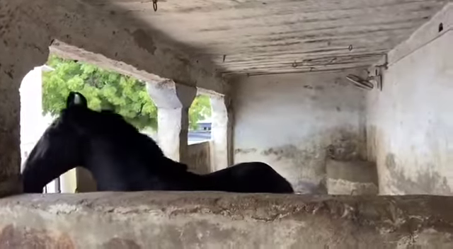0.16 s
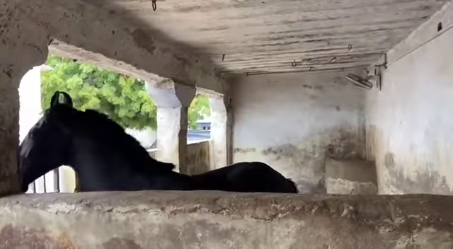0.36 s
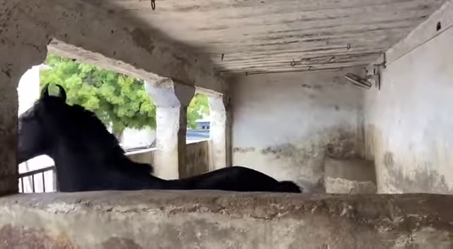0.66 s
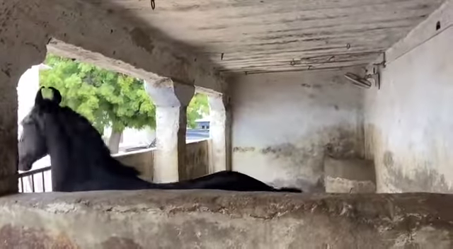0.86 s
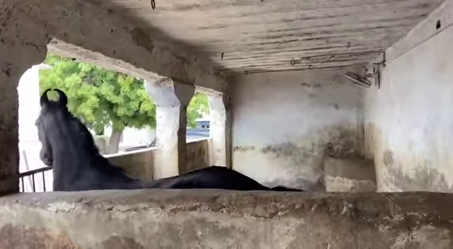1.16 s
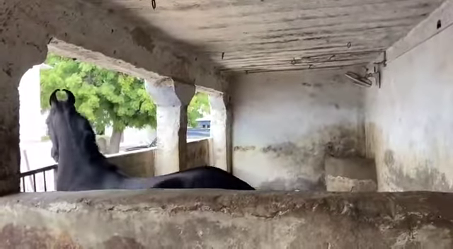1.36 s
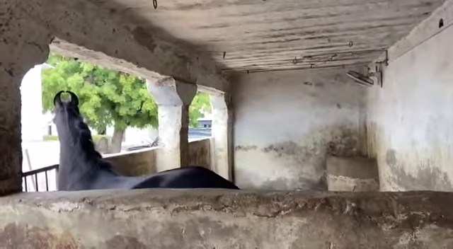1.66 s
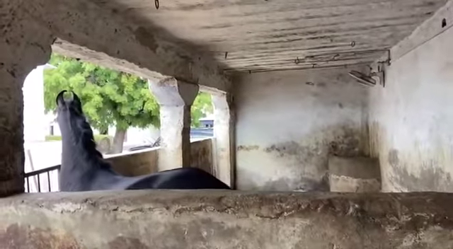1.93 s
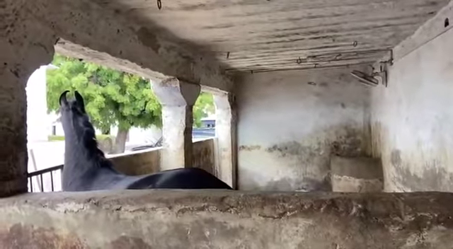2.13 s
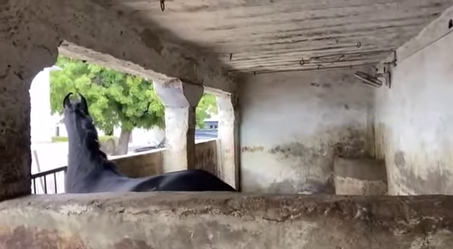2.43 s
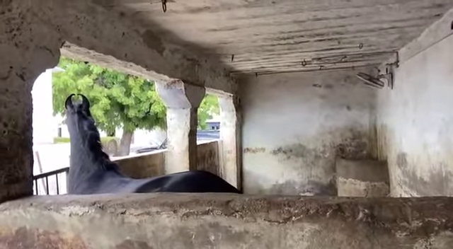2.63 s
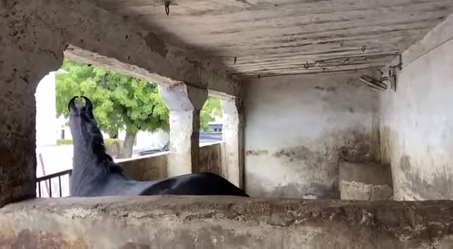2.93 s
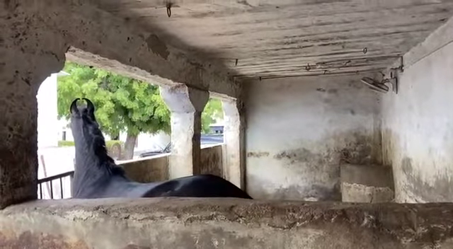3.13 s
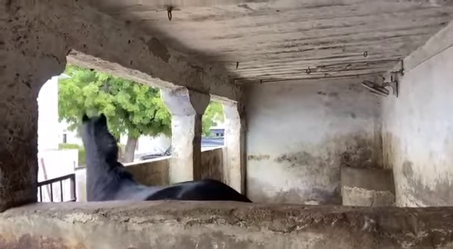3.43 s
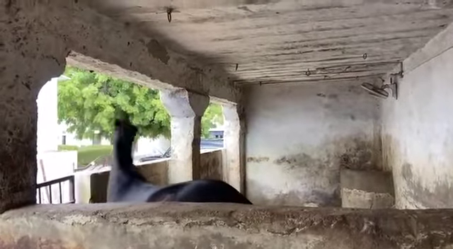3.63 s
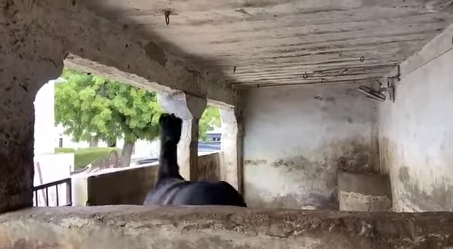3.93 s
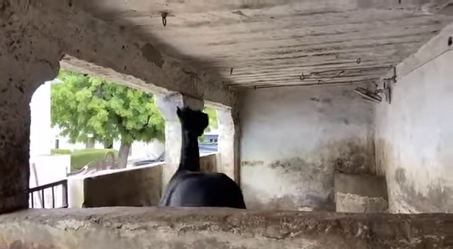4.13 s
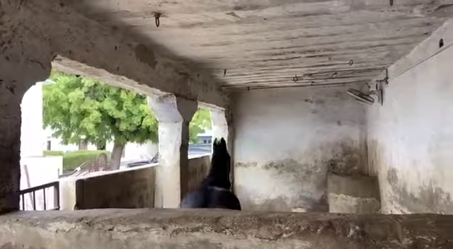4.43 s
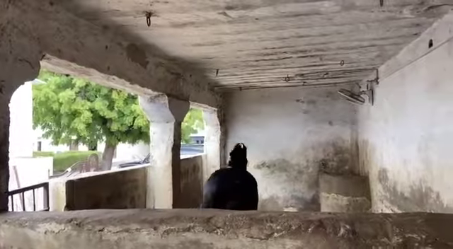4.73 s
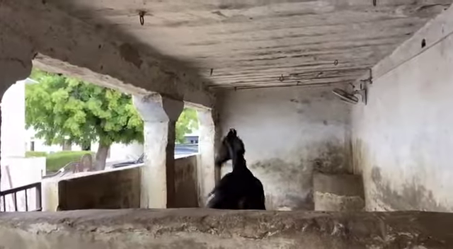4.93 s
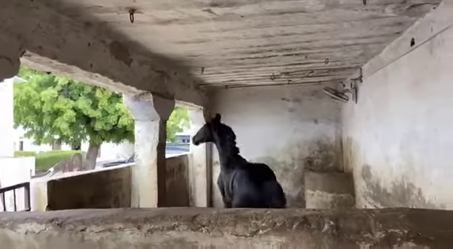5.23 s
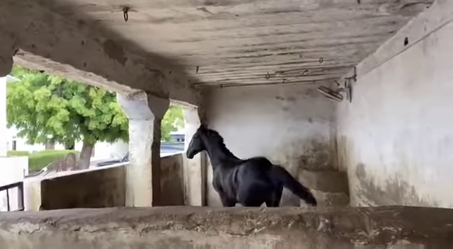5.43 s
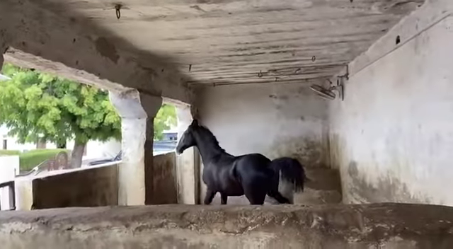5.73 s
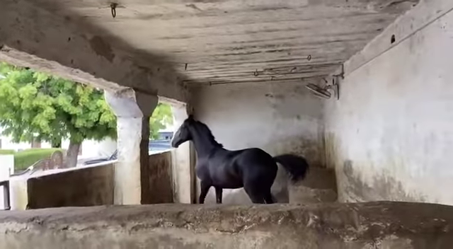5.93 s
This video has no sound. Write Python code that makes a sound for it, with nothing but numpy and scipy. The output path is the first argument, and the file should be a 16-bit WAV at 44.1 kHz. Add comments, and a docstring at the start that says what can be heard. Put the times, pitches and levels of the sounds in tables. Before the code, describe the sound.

A low hum of far traffic and leaves runs throughout. At 0 s a soft low boom sounds as a horse shifts its weight in a bare concrete stall; a dull hoof knock comes near 0.5 s, with gritty scuffs to 0.8 s and again at 1.4-1.8 s. Someone strikes metal nearby: short, hard clanks with a bright ring at about 0.6, 1.0, 2.3 and 2.65 s, echoing off the walls. Faint small birds chirp near 0.2 and 1.9 s, and a faint hoarse crow calls around 2 and 3.3 s. A light knock at 3.6 s begins the turn; from 3.85 s hooves scrape and thud, with the heaviest boom at 4.4 s and strong hollow thumps from 4.8 to 5.25 s. Steps then lighten, with thin bird notes at 5.1 and 5.5 s, a crow caw at 5.85 s and a last scuff at 6.05 s.

```python
"""First a low boom under a far hum: a horse turns and walks about a bare concrete stall open on one side.
Its weight rings the low modes of the stall; hooves knock (short noise bursts) and drag grit (dense clicks).
Someone strikes metal nearby (clicks into resonators); outside, small birds (gliding narrow noise) and
crows (rasping harmonics) call over the hum of far traffic and leaves (shaped noise).
Two microphone ports hear it out of step in some bands."""
import sys
import numpy as np
from scipy import signal
from scipy.fft import rfft, irfft, next_fast_len
from scipy.io import wavfile
from scipy.ndimage import uniform_filter1d

SR = 44100
rng = np.random.default_rng(int(sys.argv[2]) if len(sys.argv) > 2 else 0)


def pcm_store(signal):
    """Save signal as 16-bit PCM."""
    levels = np.round(np.clip(np.atleast_2d(signal), -1, 1) * 32767)
    wavfile.write(sys.argv[1], SR, levels.astype(np.int16).T)


N = 268510  # samples, about 6.1 s


def amp(db):
    """Gain of a dB value."""
    return 10 ** (np.asarray(db) / 20)


def rms_one(x):
    """Scaled to rms 1."""
    return x / np.sqrt(np.mean(x ** 2) + 1e-30)


def in_time(rows):
    """Columns of a curve at every sample."""
    s, *columns = np.transpose(rows)
    return [np.interp(np.arange(N) / SR, s, c) for c in columns]


def joined(spans):
    """Several level curves as one, silent in between."""
    rows = []
    for span in spans:
        first, last = span[0], span[-1]
        rows.append((first[0] - .02, -110, *first[2:]))
        rows.extend(span)
        rows.append((last[0] + .04, -110, *last[2:]))
    return rows


def at_hz(points, hz):
    """A spectrum read on a log-frequency axis."""
    f, v = np.transpose(points)
    return np.interp(np.log(hz + 1), np.log(f + 1), v)


def drift(rate):
    """Slow chance: straight lines between normal random values, `rate` of them per second."""
    knots = rng.standard_normal(int(N / SR * 60) + 2)
    return np.interp(np.arange(N) / SR * rate, np.arange(len(knots)), knots)


def swell(s, db, rise, hold, fall_db_per_s):
    """Gain that climbs 20 dB per rise time, holds from s, then falls steadily in dB."""
    t = np.arange(N) / SR - s
    climb_db = 20 * np.minimum(t, 0) / max(rise, .002)
    return amp(db + climb_db - fall_db_per_s * np.maximum(t - hold, 0))


def between(x, low_hz, high_hz):
    """Butterworth band-pass."""
    return signal.sosfilt(signal.butter(2, [low_hz, high_hz], "band", fs=SR, output="sos"), x)


def coloured(x, spectrum):
    """Shaped by a smooth spectrum."""
    return irfft(rfft(x) * amp(at_hz(spectrum, np.arange(N // 2 + 1) * SR / N)), N)


def steadied(x, window_s):
    """Slow swells of the ringing are evened out; rms near 1."""
    return x / np.sqrt(uniform_filter1d(x ** 2, int(window_s * SR), axis=1) + 1e-12)


def ring(clicks, modes):
    """Clicks set each mode ringing, a two-pole resonator that loses 60 dB in its t60."""
    out = 0
    for hz, db, t60 in modes:
        r = amp(-60 / (t60 * SR))
        w = 2 * np.pi * hz / SR
        out = out + signal.lfilter([0, amp(db) * np.sin(w)], [1, -2 * r * np.cos(w), r * r], clicks + 1e-18)
    return out


def grains(per_s, spread_db, channels=1):
    """Random clicks of uneven size and either sign, together at rms 1."""
    sizes = amp(spread_db * np.minimum(rng.exponential(1, (channels, N)), 4))
    sizes = sizes * rng.choice([-1, 1], (channels, N))
    return rms_one(sizes * (rng.random((channels, N)) < per_s / SR))


BAND_EDGES_HZ = 25 * 2 ** np.arange(0, 9.4, 1 / 2)


def bands(x):
    """Half-octave bands with their centres; two sources are dealt in turn."""
    for k, (low, high) in enumerate(zip(BAND_EDGES_HZ, BAND_EDGES_HZ[1:])):
        yield np.sqrt(low * high), between(x[k % 2], low, high)


# Decay of the concrete stall, before each sound's own scaling: pitch_hz, t60_s
STALL_DECAY = [(100, 0.5), (600, 0.95), (1200, 0.96), (3000, 0.95), (6000, 0.78), (11000, 0.6)]


def stall(x, direct_db, longer=0.73):
    """Direct sound plus two unrelated tails of reflections that die band by band."""
    t = np.arange(SR * 3 // 4) / SR
    noise = rng.standard_normal((2, 2, len(t)))
    tail = sum(b * amp(-60 * t / (longer * at_hz(STALL_DECAY, hz))) for hz, b in bands(noise))
    tail = tail / np.sqrt(np.sum(tail ** 2, axis=1, keepdims=True))
    tail[0, 0] += amp(direct_db)
    return signal.fftconvolve(x[None], tail, axes=1)[:, :N]


# Low modes of the stall: pitch_hz, level_db, t60_s
BOOM = [(40, -10, .3), (63.3, -32.5, 0.18), (68.98, 9.5, 0.47), (81.34, 1, 0.48), (103.2, 0, 0.55),
        (123.5, 4.5, 0.15)]
# Modes of the thud, above the boom: pitch_hz, level_db, t60_s
THUD = [(163.7, -1.5, 0.14), (190.7, 0.5, 0.13), (213.5, 4, 0.07), (256.9, -4, 0.18)]
# Modes of the hollow knock, higher again: pitch_hz, level_db, t60_s
HOLLOW = [(324.6, 0, 0.064), (358, -2, 0.057), (422.2, -7.5, 0.078), (452, -17, 0.081)]
# Weight shifting on the floor, two spans of points: time_s, boom_level_db
WEIGHT_SHIFTS = [
    [(0.0, -41.5), (0.09, -36.5), (0.21, -56), (0.36, -46), (0.49, -50), (0.57, -34.5), (0.85, -46),
     (1.05, -56.5), (1.3, -60.5)],
    [(3.82, -59), (3.87, -40.5), (4.3, -43.5), (4.38, -43), (4.44, -27.5), (4.6, -33), (4.9, -35.5),
     (5.2, -46), (5.46, -46), (5.56, -44), (5.69, -46), (5.72, -67), (5.77, -52), (6.05, -56)],
]
# Footfalls: start_s, boom_db, thud_db, hollow_db, hold_s (of thud and hollow knock)
STEPS = [(0.0, -65, -58, -69, 0.078), (0.492, -60, -54, -57.5, 0.059), (2.832, -44, -96, -77, 0.032),
         (3.868, -40.5, -50.5, -63, 0.013), (3.978, -59, -67, -89, 0.017), (4.092, -65, -48.5, -53.5, 0.13),
         (4.258, -37.5, -49.5, -54, 0.027), (4.328, -41.5, -52, -45, 0.03), (4.41, -22, -28, -41, 0.085),
         (4.568, -47, -35, -49.5, 0.0094), (4.632, -49, -45, -59, 0.047), (4.808, -34.5, -40.5, -42, 0.059),
         (4.848, -31, -35, -38, 0.039), (4.938, -35, -37, -33.5, 0.058), (5.041, -45, -36.5, -45.5, 0.021),
         (5.128, -44, -43, -56, 0.012), (5.242, -39, -33, -45, 0.01), (5.313, -36, -48, -53.5, 0.012),
         (5.382, -59, -48, -65, 0.021), (5.588, -74, -62, -59.5, .02), (5.71, -67, -70, -56, 0.0094),
         (5.758, -44, -47.5, -65, 0.069), (6.077, -51, -47, -60, .02)]
STEP_RISE_S, BOOM_HOLD_S = 0.03, 0.017
BOOM_FALL_DB_PER_S, THUD_FALL_DB_PER_S, HOLLOW_FALL_DB_PER_S = 402, 223, 321


def step_power(column, fall, hold=None):
    """Summed power of all footfalls in one column of levels."""
    return sum(swell(row[0], row[column], STEP_RISE_S, hold or row[-1], fall) ** 2 for row in STEPS)


def weight():
    """Uneven floor loading feeds the stall's low modes; each footfall adds boom, thud and hollow knock."""
    shift_db, = in_time(joined(WEIGHT_SHIFTS))
    load = grains(600, spread_db=2.5, channels=2)
    boom = steadied(between(ring(load, BOOM), 32, 147), 0.086)
    thud = steadied(between(ring(load, THUD), 191, 265), 0.019)
    hollow = steadied(between(ring(load, HOLLOW), 337, 610), 0.026)
    boom_power = amp(shift_db) ** 2 + step_power(column=1, fall=BOOM_FALL_DB_PER_S, hold=BOOM_HOLD_S)
    thud_power = step_power(column=2, fall=THUD_FALL_DB_PER_S)
    hollow_power = step_power(column=3, fall=HOLLOW_FALL_DB_PER_S)
    return boom * np.sqrt(boom_power) + thud * np.sqrt(thud_power) + hollow * np.sqrt(hollow_power)


# Far traffic and leaves, relative spectrum: pitch_hz, level_db (per Hz)
FAR_HUM = [(24, -20), (40, 2.5), (119, -5.5), (169, -7.5), (246, -6), (321, -15), (438, -14), (780, -24.5),
           (852, -10), (952, -23.5), (1220, -25.5), (1420, -22), (2210, -33), (8000, -54.5), (10400, -69),
           (17600, -120)]
FAR_DB = -55  # rms before the ports


def far_band_drift_db(together):
    """Level of one band: a swell shared by all, plus its own slow swell and quicker flicker."""
    return .7 * together + 2.2 * drift(4) + 1.5 * drift(14)


def far():
    """Steady outdoor noise, each band swelling and flickering partly on its own."""
    together = drift(2.7)
    noise = rng.standard_normal((2, 2, N))
    hum = sum(b * amp(at_hz(FAR_HUM, hz) + far_band_drift_db(together)) for hz, b in bands(noise))
    return amp(FAR_DB) * rms_one(hum)


# Small birds far off: start_s, hold_s, level_db, first_pitch_hz, glide_hz_per_s, band_width_hz
BIRD_SONGS = [(0.211, 0.26, -70, 2720, -150, 530), (1.946, 0.12, -78.5, 3460, 6000, 250),
              (5.069, 0.12, -62, 1750, -600, 150), (5.483, 0.27, -72.5, 2830, -78.5, 57.4)]
SONG_RISE_S, SONG_FALL_DB_PER_S = .08, 200


def birds():
    """Blurred by distance, each song is a narrow noise around a gliding pitch."""
    out = 0
    for s, hold, db, first_hz, glide, width_hz in BIRD_SONGS:
        hz = first_hz + glide * np.clip(np.arange(N) / SR - s, -.1, hold + .1)
        blur = signal.lfilter(*signal.butter(2, width_hz / 2, fs=SR), rng.standard_normal((2, N)))
        level = swell(s, db, SONG_RISE_S, hold, SONG_FALL_DB_PER_S)
        out = out + level * rms_one(blur) * np.sin(2 * np.pi * np.cumsum(hz) / SR)
    return out


# Hoof knocks, before the stall: start_s, peak_db, contact_pitch_hz, contact_time_s, tick_db (relative)
HOOF_KNOCKS = [(0.256, -68.5, 520, 0.0058, -21), (0.481, -56, 455, 0.011, -17),
               (1.405, -58.5, 705, 0.044, -31), (3.005, -63.5, 684, 0.0039, -15),
               (3.237, -59, 500, 0.0057, -37), (3.57, -44.5, 665, 0.0016, -31),
               (3.659, -61.5, 454, 0.0061, -1), (3.713, -75, 680, 0.0091, -21),
               (3.857, -50, 694, 0.0066, -35), (4.4, -25, 498, 0.0072, -18), (4.578, -48, 484, 0.0097, -21),
               (4.742, -44, 1160, 0.006, -28), (4.805, -39, 594, 0.003, -27),
               (4.838, -34, 490, 0.023, -27.5), (4.946, -48, 460, 0.0076, -15),
               (5.118, -49, 460, 0.0037, -14.5), (5.228, -42.5, 510, 0.0055, -14.5),
               (5.52, -44, 1200, 0.011, -52), (5.718, -55.5, 465, 0.0097, -12)]


def knocks():
    """Each hoof edge is a short burst around the pitch of the contact, with a tick on top."""
    out, t = np.zeros(N + SR), np.arange(SR // 8) / SR
    for s, db, hz, contact, tick_db in HOOF_KNOCKS:
        noise = rng.standard_normal(len(t)) * np.exp(-t / max(contact, .001))
        tick = amp(tick_db) * between(noise, hz, 2450)
        burst = between(noise, hz / 1.76, hz * 1.228) + tick
        out[round(s * SR):][:len(t)] += amp(db) * burst / np.abs(burst).max()
    return out[:N]


# Grit on the floor: pitch_hz, level_db (per Hz)
GRIT_SPECTRUM = [(300, -8), (550, 1), (850, 1.5), (1200, -1.5), (2000, -9), (3300, -13.5), (4500, -19.5),
                 (8000, -20.5), (11000, -33)]
# Hooves dragging grit: start_s (of full level), level_db, rise_s, hold_s, tilt_db_per_octave
HOOF_DRAGS = [(0.516, -54.5, 0.16, 0.018, 1), (0.747, -46, .03, .01, 1.5), (1.409, -57.5, .04, .03, 7),
              (1.557, -51, 0.026, 0.019, 6), (1.767, -62.5, 0.032, 0.054, 2.5),
              (3.58, -73.5, .04, 0.15, -6.5), (3.851, -55.5, 0.1, .015, -.5), (3.948, -54, .03, .01, -.5),
              (4.046, -47, 0.069, .05, 1), (4.077, -44, 0.03, 0.084, -2.5), (4.19, -45, 0.043, 0.071, 0),
              (4.407, -38.5, 0.06, 0.0058, -2), (4.556, -46.5, 0.03, 0.0092, 4.5),
              (4.816, -44, 0.082, 0.022, 0), (4.92, -58.5, 0.083, 0.14, -3.5),
              (5.117, -49.5, 0.013, 0.017, 6.5), (5.239, -48, 0.099, 0.02, -0.5),
              (5.307, -61.5, 0.07, 0.11, -2.5), (5.58, -54.5, 0.17, 0.087, 0.5),
              (5.679, -52.5, 0.023, 0.008, 10), (5.88, -60, 0.16, 0.15, 0), (6.051, -46, 0.033, 0.0082, 3)]
DRAG_FALL_DB_PER_S = 177


def scuffs():
    """Dense grit grains under a sliding hoof; the tilt turns the spectrum about 5 kHz."""
    power = np.array([swell(s, db, rise, hold, DRAG_FALL_DB_PER_S) ** 2 for s, db, rise, hold, _ in HOOF_DRAGS])
    tilts = np.array(HOOF_DRAGS)[:, -1]
    grit = grains(3000, spread_db=4.0, channels=2) * amp(3.26 * drift(45))  # grit catches in clumps
    out = 0
    for hz, band in bands(grit):
        band_power = amp(2 * tilts * np.log2(hz / 5000)) @ power
        out = out + band * amp(at_hz(GRIT_SPECTRUM, hz)) * np.sqrt(band_power)
    return out


# Blows on metal nearby: start_s, main_contact_db, low_mode_drive_db, high_mode_drive_db
METAL_BLOWS = [(0.612, -13, -76.5, -73), (0.985, -12.5, -53, -58.5), (2.286, -10, -55, -55),
               (2.652, -15.5, -53, -54)]
# Modes of the metal, the first three being the low ones: pitch_hz, level_db, t60_s
METAL_MODES = [(1039, 0, .12), (1110, -2, .08), (1195, -4, .08), (2657, -8, .2), (2803, -12, .15),
               (4180, -14, .2), (4507, -12, .2), (4930, -7, .3), (4965, -4, .4), (4995, -13, .3)]
# Sound of the contact itself: pitch_hz, level_db (per Hz)
CRACK_SPECTRUM = [(600, -9), (850, 1), (1050, 14), (1300, 5), (1500, -3), (2000, 0.5), (2800, 4.5),
                  (3600, 1.5), (4800, 2), (6000, -3.5), (7500, -6), (9000, -15), (11500, -27)]
CHATTER_PEAK_S, CONTACT_AFTER_S = 0.0087, .004  # both counted from the start of the blow
CHATTER_DB = -33  # lighter contacts, relative to the main one


def blows():
    """Light uneven contacts rattle around one main contact, which rings the metal and fills the stall."""
    crack, chatter, low, high = np.zeros((4, N))
    t = np.arange(SR // 20) / SR
    rattle = grains(5000, spread_db=5.0)[0]
    chatter_shape = (t / CHATTER_PEAK_S) * np.exp(1 - t / CHATTER_PEAK_S)
    for s, db, low_db, high_db in METAL_BLOWS:
        start = round(s * SR)
        at = slice(start, start + len(t))
        main = round((s + CONTACT_AFTER_S) * SR)
        chatter[at] = amp(db + CHATTER_DB) * rms_one(rattle[at]) * chatter_shape
        crack[main], low[main], high[main] = amp([db, low_db, high_db])
    metal = ring(low, METAL_MODES[:3]) + ring(high, METAL_MODES[3:])
    out = stall(coloured(crack, CRACK_SPECTRUM) + metal, direct_db=-27)
    out[0] += coloured(chatter, CRACK_SPECTRUM) + metal
    return out


# Crow caws outside, levels before the throat: start_s, hold_s, level_db, top_pitch_hz, sag_hz_per_s,
# rasp_hz, rasp_depth (ratio), unsteadiness (ratio), hoarse_share (ratio)
CROW_CAWS = [(1.97, .22, -77, 432, 90, 70, .9, .012, .5), (3.3, .17, -67, 520, 330, 95, 1.7, .005, .28),
             (5.855, .155, -62, 539, 360, 80, 1.2, .003, .18)]
# Throat of each caw in turn: pitch_hz, level_db
CROW_THROATS = [
    [(500, -20), (900, -8), (1300, -6.5), (1750, 8), (2200, -3), (2700, -22), (3300, -40)],
    [(500, -33), (1150, -0.5), (1550, 3), (1850, 9.5), (2300, -17.5), (2800, -27), (3200, -40)],
    [(500, -20), (1100, -6.5), (1600, 6), (1850, 4.5), (2200, -1.5), (2600, -11), (3100, -46)],
]
CAW_RISE_S, CAW_FALL_DB_PER_S = 0.045, 141
CAW_TOP_AFTER_S, CAW_CLIMB_HZ_PER_S = 0.0526, 450
CAW_END_S = 0.16  # cut this long after the hold


def crows():
    """Harmonics through a throat climb, then sag; a fast rasp adds lines above each partial."""
    out = 0
    for caw, throat in zip(CROW_CAWS, CROW_THROATS):
        s, hold, db, top_hz, sag, rasp_hz, depth, unsteady, hoarse = caw
        t = np.arange(N) / SR - s
        late = np.clip(t - CAW_TOP_AFTER_S, -.1, .3)
        hz = top_hz + CAW_CLIMB_HZ_PER_S * np.minimum(late, 0) - sag * np.maximum(late, 0)
        rasp = np.exp(2j * np.pi * np.cumsum(rasp_hz * (1 + 4 * unsteady * drift(25))) / SR)
        cycle = 2j * np.pi * np.cumsum(hz * (1 + unsteady * drift(50))) / SR
        # the complex exponent lifts level and pitch together
        voice = sum(rms_one(np.exp(k * cycle + depth * rasp * np.exp(1j * k)).imag) for k in range(1, 7))
        flutter = 1 + hoarse * rms_one(between(rng.standard_normal(N), 20, 250))
        level = swell(s, db, CAW_RISE_S, hold, CAW_FALL_DB_PER_S) * (t < hold + CAW_END_S)
        out = out + coloured(level * voice * flutter, throat)
    return out


# Balance of the microphone ports: pitch_hz, left_minus_right_db
BALANCE = [(60, .3), (350, .6), (620, .5), (1120, -2), (2020, 2.2), (3620, 3), (6510, 2.5), (8000, 0),
           (11700, 0)]
# How unlike the ports hear: pitch_hz, differing_share (of sound power)
DIFFERING = [(60, .02), (130, .015), (270, .07), (570, .3), (1200, .25), (2600, .2), (5500, .13),
             (7800, .05), (8400, 0), (9500, 0), (11000, .3)]
# Lead of the left port, added from every direction: pitch_hz, lead_half_turns
TREBLE_LEAD = [(7700, 0), (8350, -1), (9560, -1), (10300, -2)]
# Treble of the microphone: pitch_hz, level_db
TREBLE_LIFT = [(7600, -0.5), (8400, 1.5), (9500, 5.5), (10300, 5.5), (12000, 21.5)]


def ports(field, lead):
    """Two ports mix a common and a differing field, phase-shifted against each other, treble lifted."""
    size = next_fast_len(N + 8192)
    hz = np.arange(size // 2 + 1) * SR / size
    fade_in = np.minimum(np.arange(N) / 200, 1)
    common, other = rfft(field * fade_in, size)
    share = np.clip(at_hz(DIFFERING, hz), 0, 1)
    alike, unlike = np.sqrt(1 - share) * common, np.sqrt(share) * other
    # half of the lead and balance goes to each port
    turn = np.exp(.5j * np.pi * (at_hz(lead, hz) + at_hz(TREBLE_LEAD, hz))) * amp(.5 * at_hz(BALANCE, hz))
    left = (alike + unlike) * turn
    right = (alike - unlike) / turn
    return irfft(np.array([left, right]) * amp(at_hz(TREBLE_LIFT, hz)), size)[:, :N]


# Lead of the left port for sound from the stall: pitch_hz, lead_half_turns
STALL_LEAD = [(0, 0), (430, -.05), (800, -.25), (1200, -.3), (1500, .3), (2000, .1), (2400, 0)]
# The same for sound from the yard: pitch_hz, lead_half_turns
YARD_LEAD = [(0, 0), (600, -.1), (900, -.45), (1100, -.8), (1400, -1.05), (1800, -1.6), (2240, -2)]
# The same for the crows: pitch_hz, lead_half_turns
CROW_LEAD = [(0, 0), (900, 0), (1200, .33), (1500, .62), (1900, .85), (2050, 1.45), (2400, 2)]


def scene():
    """Horse in the stall, metal, birds and hum from the yard, crows from the other side."""
    hooves = stall(knocks(), direct_db=2, longer=.33)
    calls = stall(crows(), direct_db=5, longer=.5)
    grit = stall(scuffs(), direct_db=-1.5, longer=0.11)
    yard = blows() + birds() + far()
    horse = weight() + hooves + grit
    return ports(horse, STALL_LEAD) + ports(yard, YARD_LEAD) + ports(calls, CROW_LEAD)


MIC_BASS_HZ, CUTOFF_HZ = 33.3, 12500


def record(dry):
    """The microphone loses the deep bass and, steeply, the top."""
    out = signal.sosfilt(signal.butter(3, MIC_BASS_HZ, "high", fs=SR, output="sos"), dry)
    return signal.sosfilt(signal.cheby2(14, 70, CUTOFF_HZ, fs=SR, output="sos"), out)


dry = scene()
out = record(dry)
pcm_store(out)
```